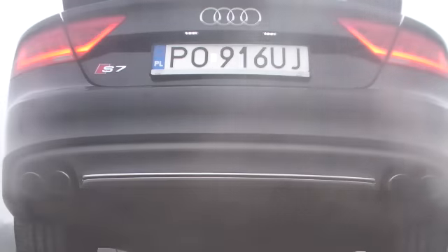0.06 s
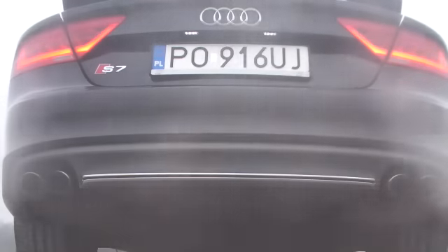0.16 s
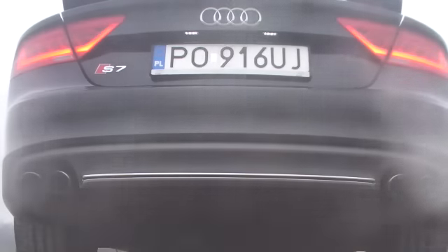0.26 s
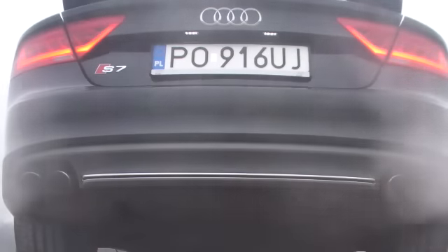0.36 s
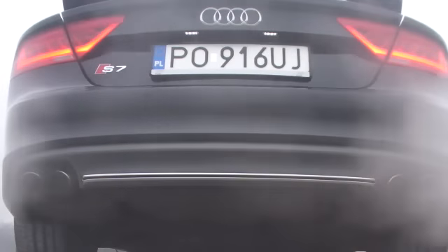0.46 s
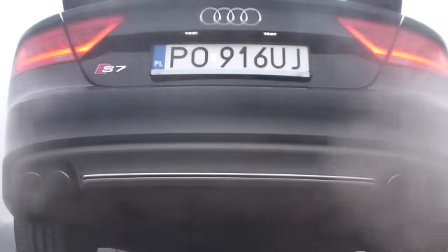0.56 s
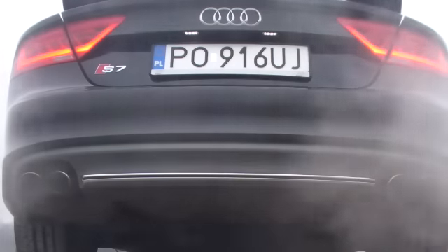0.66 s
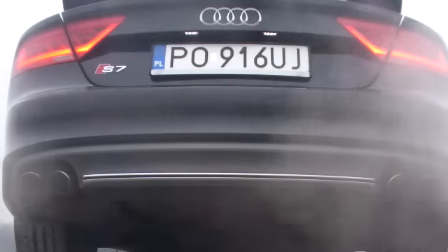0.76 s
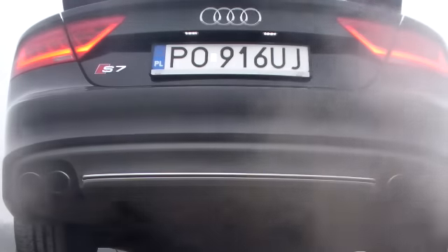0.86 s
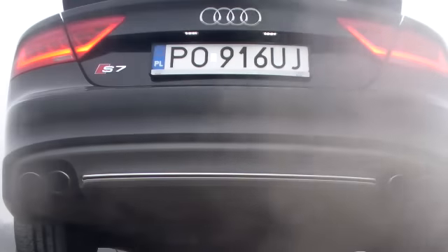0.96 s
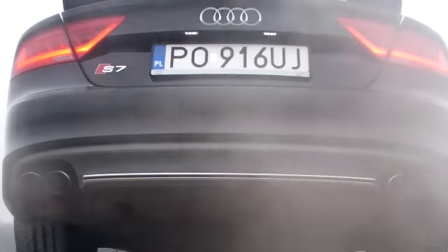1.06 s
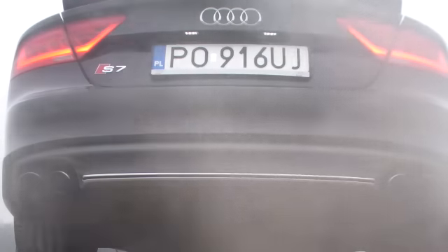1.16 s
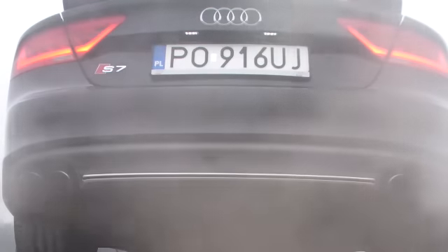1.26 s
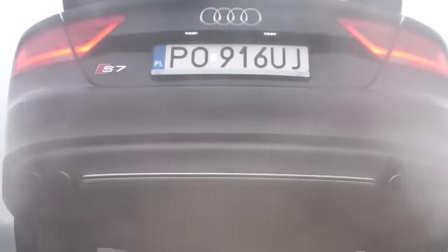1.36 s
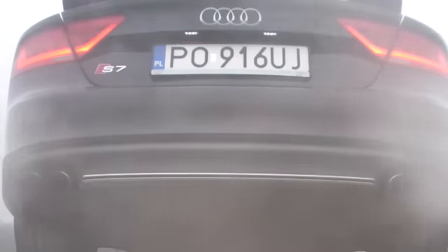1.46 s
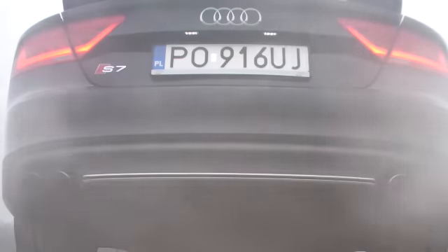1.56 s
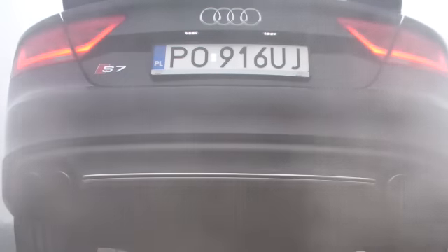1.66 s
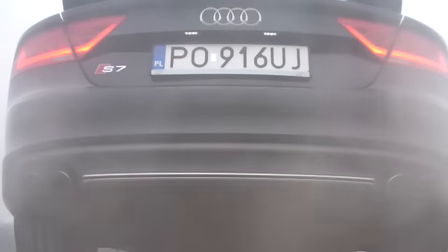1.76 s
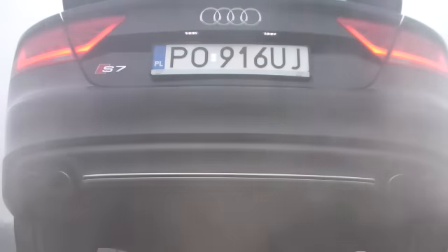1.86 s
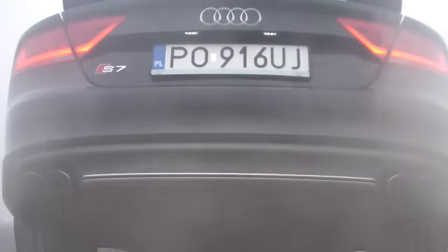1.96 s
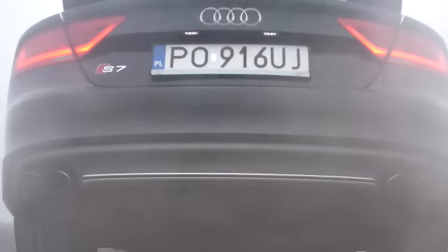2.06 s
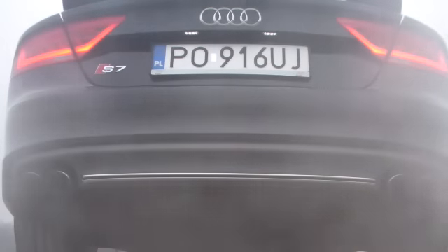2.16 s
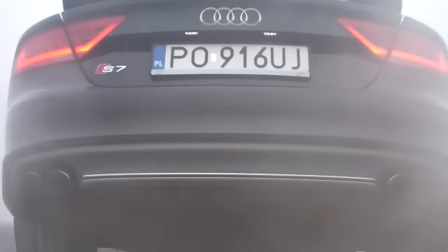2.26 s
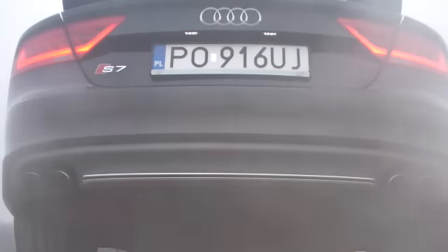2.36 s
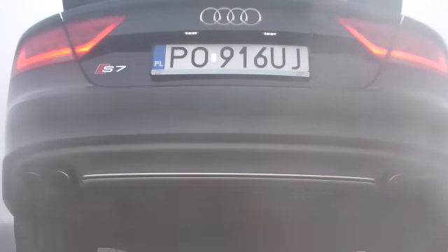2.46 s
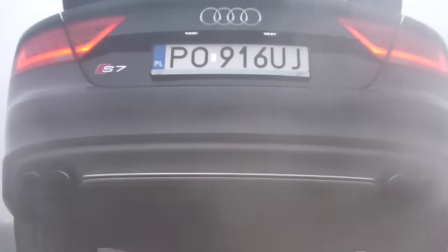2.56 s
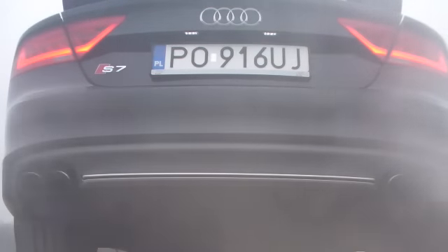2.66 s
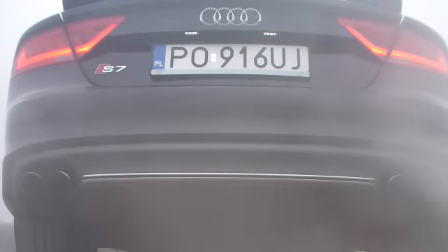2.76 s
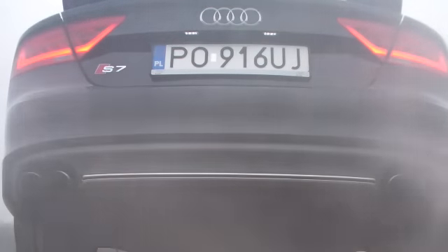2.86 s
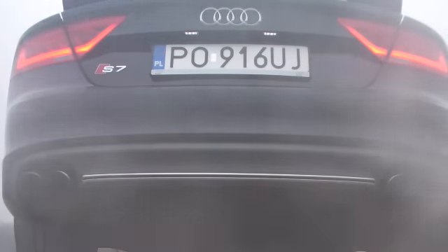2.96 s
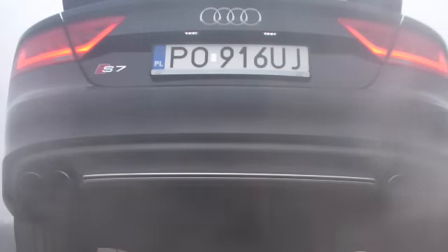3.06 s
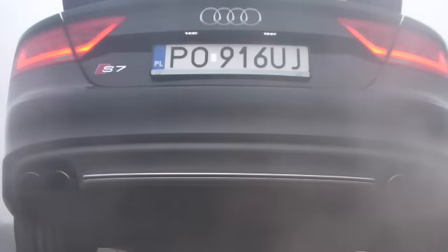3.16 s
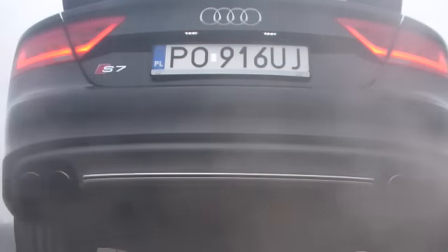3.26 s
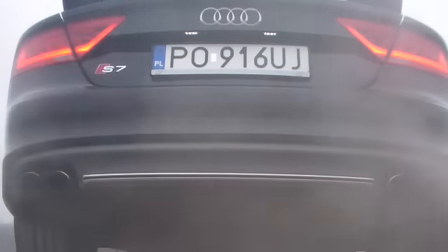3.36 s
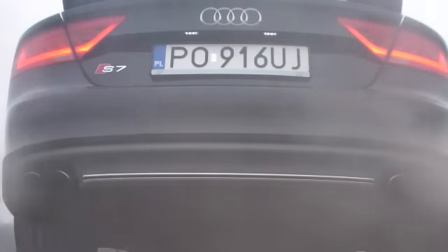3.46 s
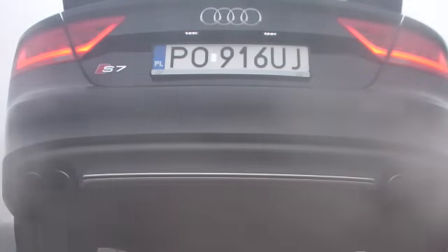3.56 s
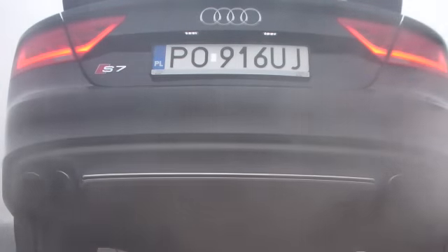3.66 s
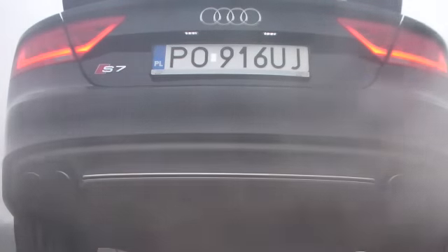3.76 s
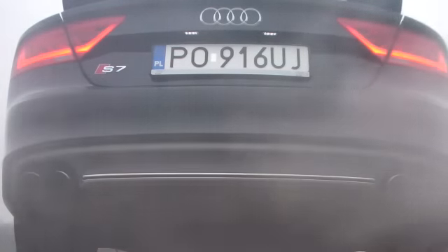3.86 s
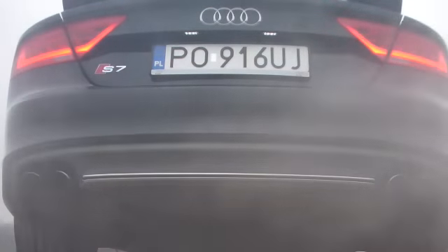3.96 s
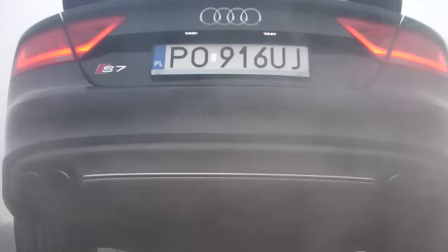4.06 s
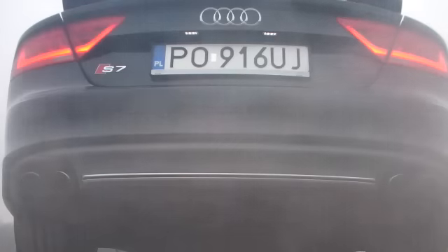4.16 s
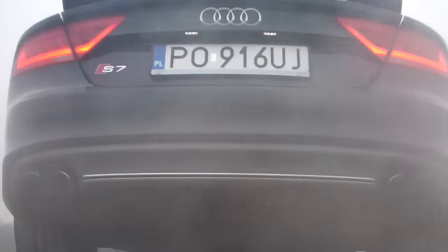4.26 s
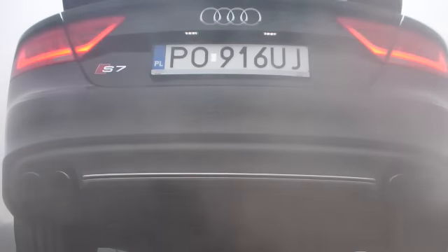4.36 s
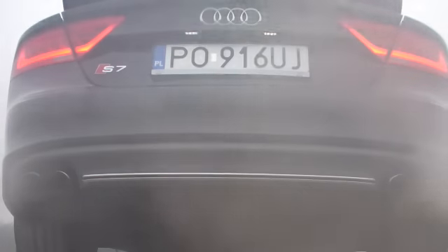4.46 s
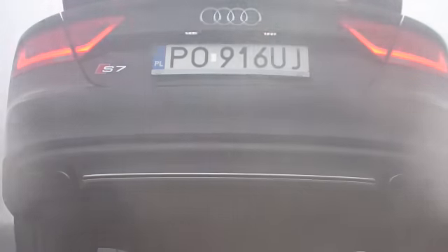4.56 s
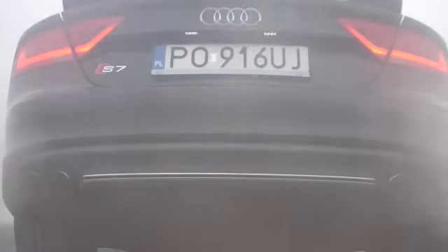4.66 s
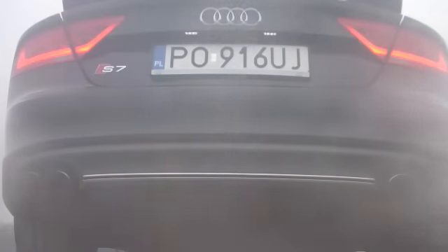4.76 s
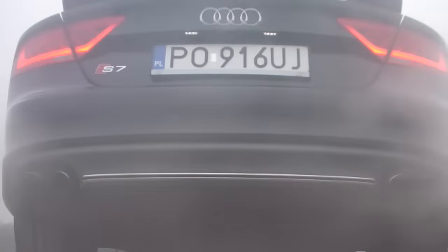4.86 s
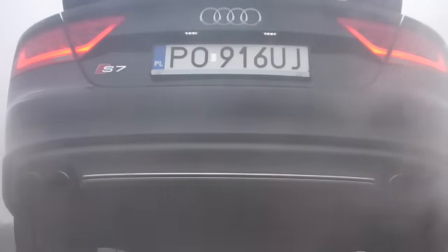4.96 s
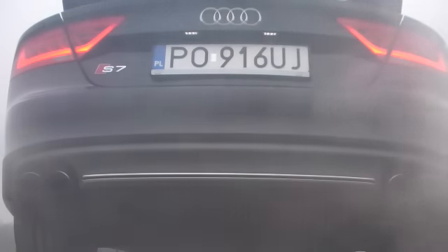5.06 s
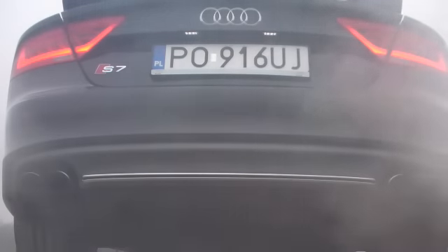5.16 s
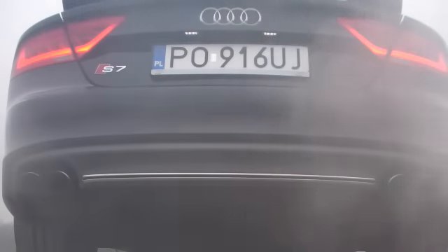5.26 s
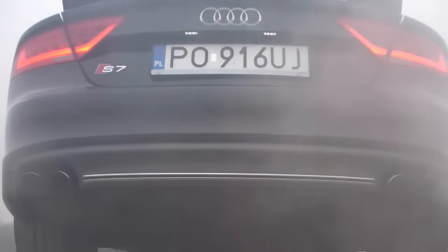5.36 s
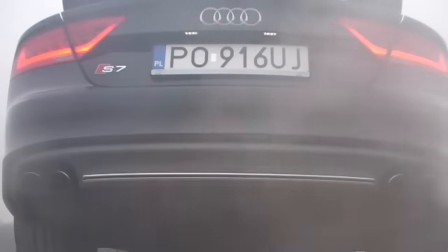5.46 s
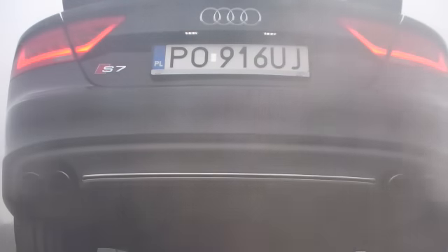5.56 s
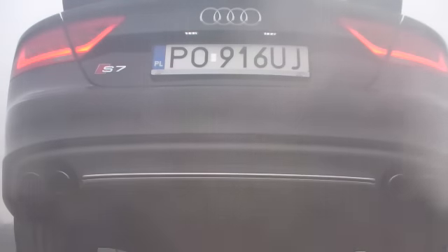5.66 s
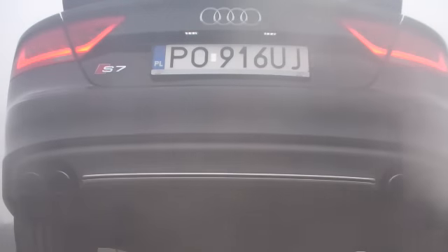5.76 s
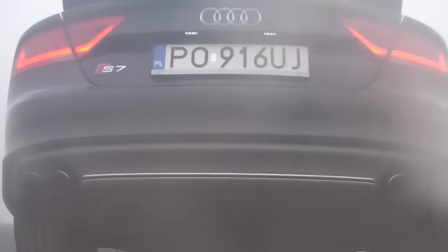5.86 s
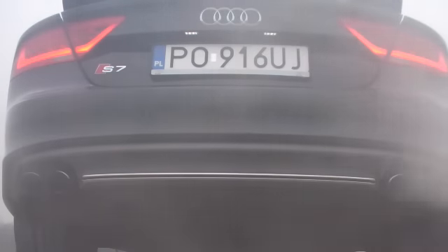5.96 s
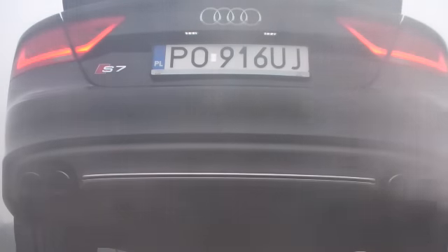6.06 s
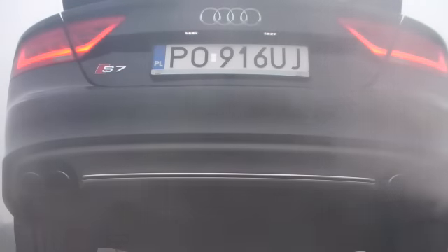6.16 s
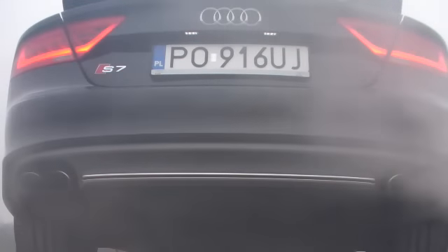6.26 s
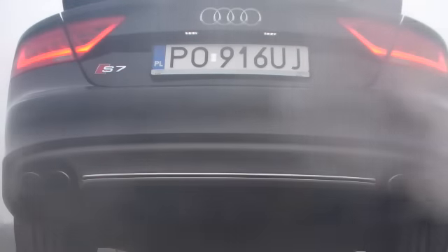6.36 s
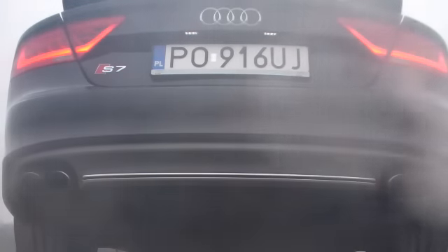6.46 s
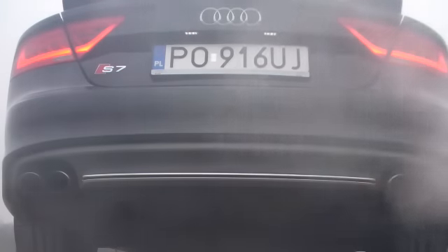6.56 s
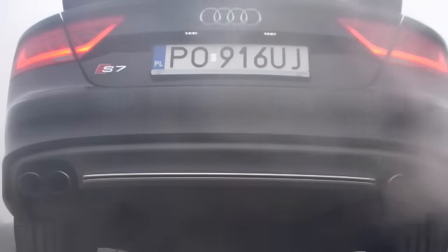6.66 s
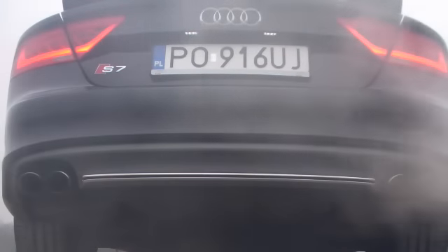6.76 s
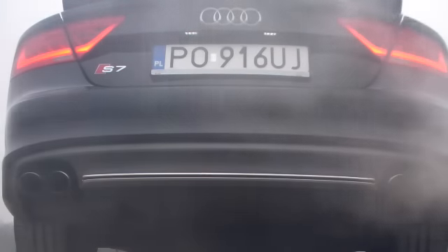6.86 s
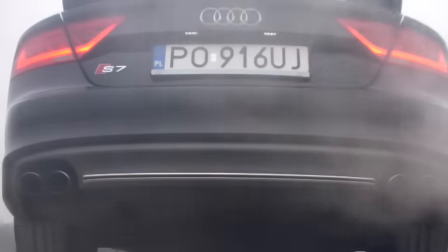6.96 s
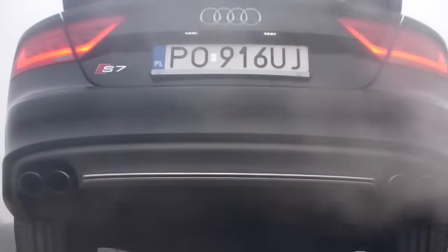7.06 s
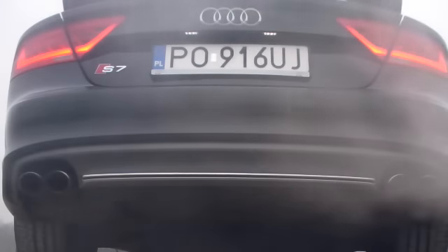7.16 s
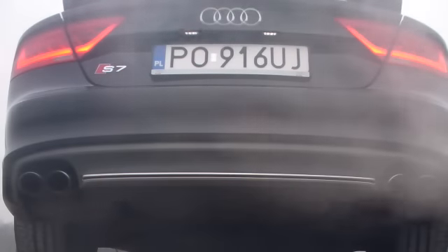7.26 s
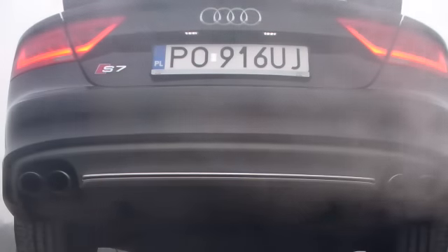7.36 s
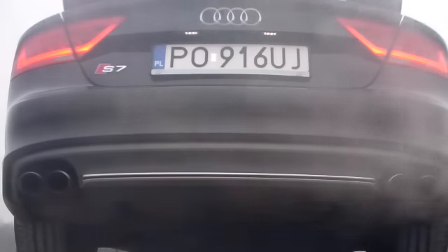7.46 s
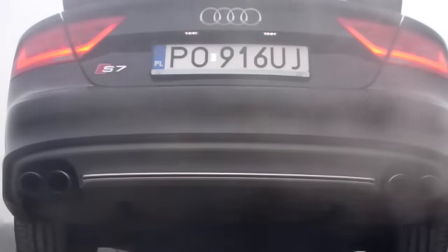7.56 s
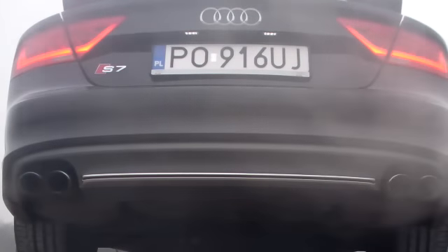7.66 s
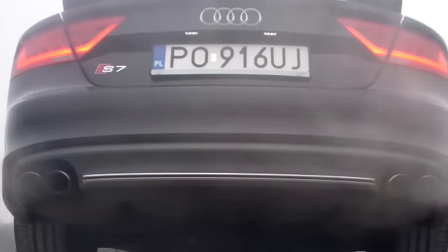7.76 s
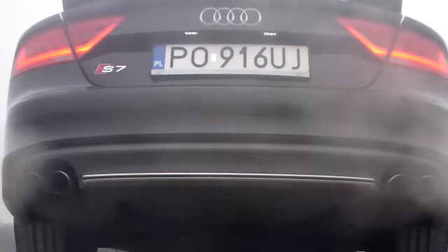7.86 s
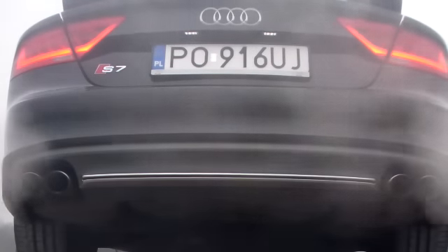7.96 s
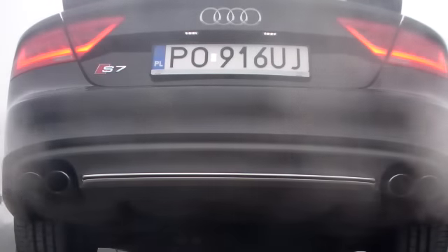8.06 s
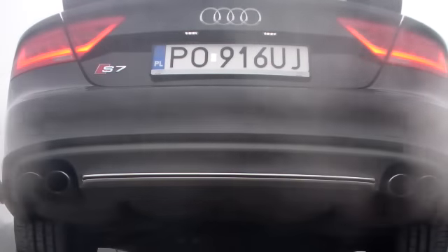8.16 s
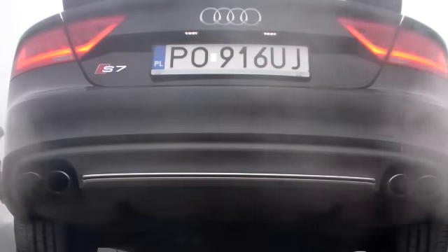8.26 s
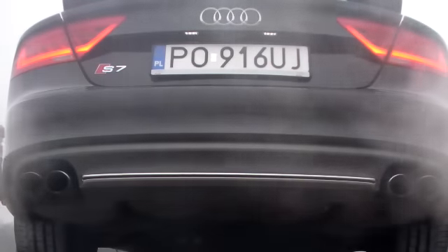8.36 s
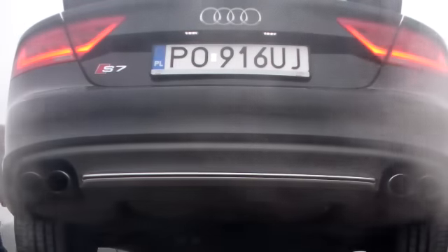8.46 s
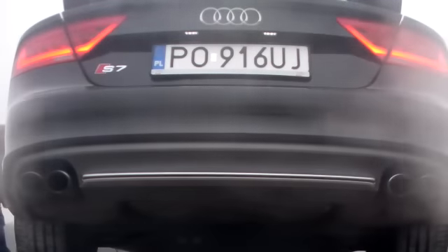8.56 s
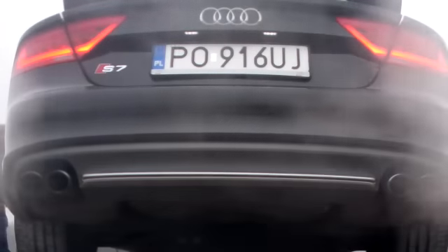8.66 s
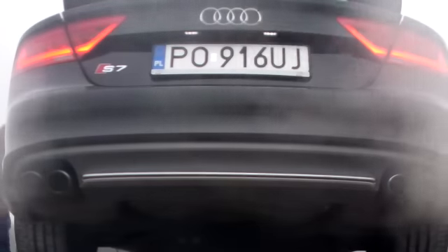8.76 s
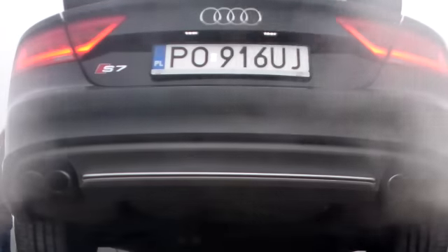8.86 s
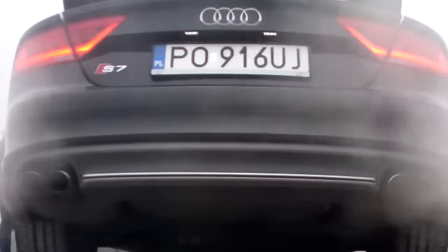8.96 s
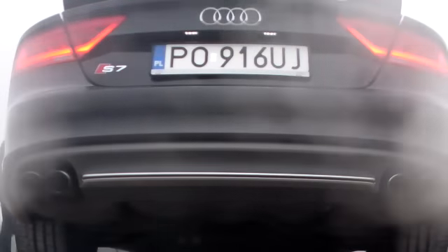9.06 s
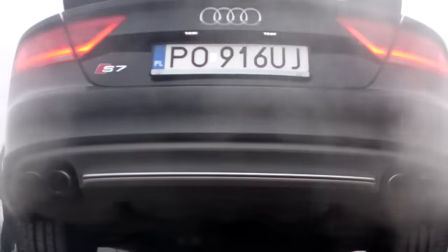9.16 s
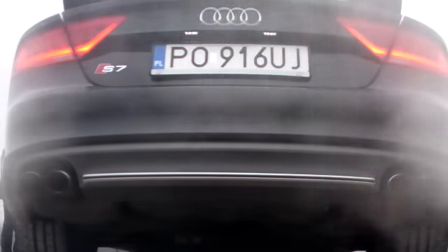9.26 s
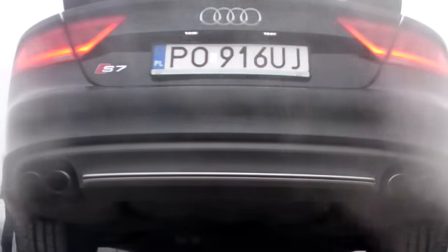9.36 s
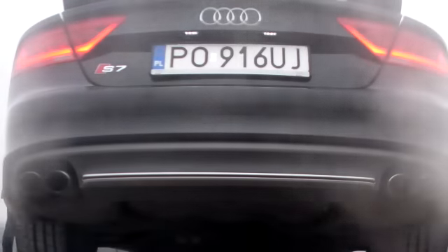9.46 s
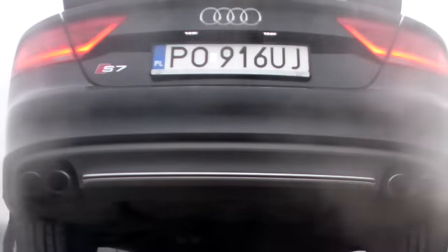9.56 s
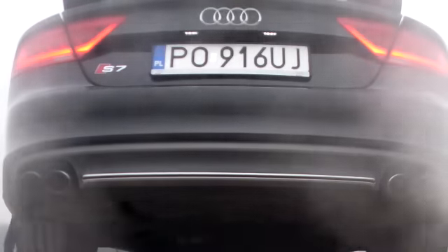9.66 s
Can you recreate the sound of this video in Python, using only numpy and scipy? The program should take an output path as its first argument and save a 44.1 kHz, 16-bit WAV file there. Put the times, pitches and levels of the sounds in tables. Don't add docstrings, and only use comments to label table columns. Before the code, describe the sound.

Close behind the exhausts of a parked eight-cylinder car, the engine snarls up in a long rev, then four quick blips with pops, thumps and gas hiss. It drops to a soft idle, revs twice more, idles again, gives a gentle half rev, and ends with a strong late-climbing roar falling away. Faint outdoor yard noise sits underneath.

```python
import sys
import numpy as np
from scipy import signal
from scipy.fft import rfft, irfft
from scipy.io import wavfile
from scipy.ndimage import uniform_filter1d

SR = 44100
rng = np.random.default_rng(int(sys.argv[2]) if len(sys.argv) > 2 else 0)


def file_out(sig):
    cols = np.atleast_2d(sig).T
    lim = np.clip(cols, -1, 1)
    pcm = np.round(lim * 32767).astype(np.int16)
    wavfile.write(sys.argv[1], SR, pcm)


def field_ratio(decibels):
    return 10 ** (np.asarray(decibels, dtype=float) / 20)


N = 428652
CONTROL_RATE = 1000

# press_s, top_s, release_s, top_cycle_hz, bend of the climb (+ early, - late)
REVS = [
    (.18, .24, .25, 14.4, 0),
    (.26, .68, .785, 32.6, .7),
    (1.205, 1.37, 1.41, 31.8, .6),
    (1.45, 1.56, 1.63, 32.5, .3),
    (1.7, 1.82, 1.88, 32.1, .3),
    (1.93, 2.0, 2.05, 31.6, .3),
    (3.31, 3.72, 3.765, 30.3, -.05),
    (4.38, 4.69, 4.84, 30.9, .1),
    (7.56, 7.89, 7.965, 15.5, .15),
    (8.49, 9.01, 9.12, 31.2, -.55),
]
START_HZ, IDLE_HZ = 17.8, 5.75
CATCH_HZ, SETTLE_S = 1.5, .4
FRICTION_HZ_PER_S, PUMPING_PER_S = 12, .3
LULL_DB, LULL_S = -1.5, 0.042

# full_s, shut_s, long_pipe_db, short_pipe_relative_db, jet_db
GULPS = [(0.287, 0.338, -26, -5, -43), (0.377, 0.375, -30, 9.5, -37), (0.433, 0.532, -18, -3, -33),
         (0.59, 0.59, -27, 6, -45), (0.681, 0.731, -11, -8.5, -34.5), (1.309, 1.367, -16.5, 2, -29.5),
         (1.563, 1.571, -9.5, -7.5, -29.5), (1.62, 1.676, -28, -12, -58), (1.791, 1.837, -19, -8, -42.5),
         (2.01, 2.005, -19.5, -3.5, -44), (2.097, 2.347, -32.5, 0.5, -62), (0.86, 0.967, -27, -1, -56),
         (5.554, 6.12, -53, 1, -58), (3.399, 3.651, -16, 3, -30), (3.677, 3.721, -19.5, 7.5, -32.5),
         (3.77, 3.79, -24, -19, -56), (4.44, 4.571, -13.5, -4, -35.5), (4.595, 4.648, -22.5, 8.5, -35.5),
         (4.699, 4.786, -20.5, -1, -43.5), (7.74, 7.832, -31, 0, -47), (7.847, 7.931, -33, 1.5, -42.5),
         (8.7, 8.957, -13, 0.5, -29.5), (8.987, 9.0, -24, 12.5, -27), (9.018, 9.081, -14, -2.5, -37)]
ATTACK_DB_PER_S, RELEASE_DB_PER_S = 203, 219
BREATHES_HZ, PIPE_DB_PER_HZ, JET_DB_PER_HZ = 27, 2.03, 1.3
GAS_LAG_S, DRONE_LAG_S = 0.096, 0.041
# cycle_hz, bank_imbalance_db (3rd order), alternate_firings_db (4th), all_firings_db (8th)
COAST_ORDERS = [(5.8, -71, -76, -47), (6.14, -73, -75, -49), (6.57, -58, -58, -35),
                (11, -57.5, -48.5, -31.5), (15.77, -35.5, -40.5, -35.5), (20, -34.5, -45.5, -34),
                (24.4, -27, -37, -49), (31.16, -30.5, -35.5, -44.5), (31.2, -30, -38.5, -53)]
# cycle_hz, pipe_ring_db, jet_db
COAST_GAS = [(5.94, -69, -72), (6.956, -53, -62), (8.438, -47, -52), (15.8, -40, -51.5),
             (20.4, -35.5, -45.5), (26, -33, -44), (31.16, -28.5, -43.5), (30.14, -34.5, -42.5)]
LOAD_SHARE = [0.13, 0.52, 0.43, -0.52]
PEDAL_DB = [-7, 1, 2]
RUSH_DB, SHORT_DB = -0.5, 2
# cycle_hz, coasting_db, pedal_down_db
ROUGHNESS = [(6, -9, -14), (8, -4, -12), (13, -8, -10), (19, -15, -9), (25, -19, -8), (30, -19, -6),
             (32, -19, 0)]

# freq_hz, gain_db
SILENCER = [(15, -24), (35, -18), (50, -2.5), (70, 1), (100, -1), (125, 5.5), (155, -0.5), (200, -12.5),
            (240, -5.5), (300, -53), (500, -38.5)]
# order, level_db
PATTERN = [(1, 0.5), (2, -10), (3, 1), (4, 1.5), (5, -0.5), (6, 2), (7, -11.5), (8, -1)]

CYLINDERS = [-2.5, -10, -9.5, -9.5]
# freq_hz, width_hz, level_db
LONG_PIPE = [(410.4, 47.4, -10.5), (432.2, 12.7, 3.5)]
SHORT_PIPE = [(492.2, 26.8, 0.5), (548.7, 38.2, -2)]
# freq_hz, width_hz, level_db
RUSH = [(222.4, 20.6, -10.5), (367, 81, -8.5), (601.6, 47.4, 0.5), (669.6, 118, -6), (783, 219, -11)]
# start_s, peak_db
POPS = [(0.58, -4), (0.653, -16), (0.868, -8), (1.289, -3.5), (1.495, -8.5), (2.019, -12), (3.606, -10),
        (3.643, -2), (4.582, -4), (8.9, -5), (9.168, -16)]
# start_s, peak_db, length_s
SPITS = [(.175, -41.5, 0.013), (0.577, -15, 0.0098), (0.659, -27, 0.01), (1.423, -23, 0.012),
         (2.026, -41.5, 0.02), (2.57, -54, 0.032), (3.125, -52, .025), (4.246, -35, 0.0058),
         (5.095, -59, 0.033), (5.319, -42, 0.037), (.86, -45, 0.022), (4.43, -37.5, 0.046)]
# freq_hz, density_db (per Hz)
HISS = [(560, -5.5), (960, -5.5), (1180, -11.5), (1710, -12.5), (1980, -8), (2200, -9.5), (3210, -4),
        (3570, -1.5), (4310, -9), (5610, -10.5), (5980, -11.5), (7070, -14.5), (7770, -10.5), (10100, -6.5),
        (11800, -16.5), (15400, -49), (22000, -120)]

# freq_hz, density_db (per Hz)
YARD = [(18, -30), (30, -42), (128, 2.5), (222, -15), (436, -4.5), (1380, -27.5), (3300, -30),
        (6820, -35.5), (10200, -31), (11800, -37.5), (15400, -76), (22000, -120)]
YARD_DB = -42
# freq_hz, coherence (0-1)
PORTS = [(60, .97), (300, .995), (3400, .996), (3900, .98), (4300, .9), (5000, .65), (7200, .8),
         (9000, .68), (12000, .4)]

# turns_per_cycle, level_db
WHINE = [(26.7, -39.5), (53.2, -49.5)]
# freq_hz, gain_db
PANEL = [(680, -27), (730, -10), (850, 2), (960, 0.5), (1000, -30)]
# start_s, peak_db, pitch_hz
THUMPS = [(0.829, -11.5, 62.6), (1.438, -8, 72.7), (1.549, -15, 59.2), (1.629, -7.5, 65),
          (1.848, -11.5, 64.6), (1.997, -8, 68), (3.759, -8, 48.4), (4.786, -6, 64.6), (6.949, -25, 53.7),
          (7.379, -40, 53.7), (9.099, -10, 75.59)]

# freq_hz, difference_db
LEAN = [(30, -2.4), (125, -.7), (300, 0), (4000, -.2), (8000, -1.5), (12000, -.6)]
# freq_hz, width_hz, gain_db
COLOUR = [(1112, 3.6, 8), (3500, 60, 2.5), (3340, 210, 0.5), (6000, 48, -21), (6610, 110, -4),
          (7190, 60, -4), (11150, 77, -9), (11470, 150, 2.5)]


def on_log(table, hz):
    f, v = np.transpose(table)
    return np.interp(np.log(np.maximum(hz, 1)), np.log(f), v)


def by_speed(table, hz):
    at, *columns = np.transpose(table)
    return [np.interp(hz, at, c) for c in columns]


def unit(x):
    return x / np.sqrt(np.mean(x ** 2))


def envelope(x, span_s):
    return np.sqrt(uniform_filter1d(x ** 2, int(span_s * SR)) + 1e-12)


def steady(x, span_s):
    return x / envelope(x, span_s)


def shape(x, gain):
    return irfft(rfft(x) * gain(np.arange(N // 2 + 1) * SR / N), N)


def ring(x, modes):
    out = 0
    for k, (hz, width, db) in enumerate(modes):
        b, a = signal.iirpeak(hz, hz / width, fs=SR)
        out = out + (-1) ** k * field_ratio(db) * signal.lfilter(b, a, x)
    return out


def walk(rate_hz):
    k = int(SR / rate_hz)
    held = np.repeat(rng.standard_normal(N // k + 1), k)
    return unit(uniform_filter1d(uniform_filter1d(held, k), k)[:N])


def swell(start_s, length_s):
    first = int(start_s * SR)
    late = np.arange(min(int(12 * length_s * SR), N - first)) / (length_s * SR)
    return slice(first, first + len(late)), late * np.exp(1 - late)


def coast(late_s, hz):
    floor = FRICTION_HZ_PER_S / PUMPING_PER_S
    caught = np.log((hz + floor) / (IDLE_HZ + CATCH_HZ + floor)) / PUMPING_PER_S
    fall = (hz + floor) * np.exp(-PUMPING_PER_S * np.maximum(late_s, 0)) - floor
    settle = IDLE_HZ + CATCH_HZ * np.exp((caught - np.maximum(late_s, caught)) / SETTLE_S)
    return np.where(late_s < caught, fall, settle)


def speed(t):
    hz, pedal, lull = coast(t, START_HZ), 0, 0
    for press, top, release, top_hz, bend in REVS:
        u = np.clip((t - press) / (top - press), 0, 1)
        low_hz = np.interp(press, t, hz)
        climb = low_hz + (top_hz - low_hz) * (u + bend * u * (1 - u))
        after = np.where(t < top, climb, coast(t - release, top_hz))
        hz = np.where(t < press, hz, after)
        pedal = pedal + ((t > press) & (t < release + .02))
        lull = lull + LULL_DB * np.exp(-((t - press) / LULL_S) ** 2)
    hz = uniform_filter1d(hz, int(.05 * CONTROL_RATE))
    pedal = uniform_filter1d(np.minimum(pedal, 1.), int(.08 * CONTROL_RATE))
    return hz, pedal, lull


def lagged(t, hz, lag_s):
    return np.minimum(hz, np.interp(t - lag_s, t, hz))


def fuel(t, hz, lull):
    ring_db, jet_db = by_speed(COAST_GAS, lagged(t, hz, GAS_LAG_S))
    long, short, jet = field_ratio(ring_db + lull), field_ratio(ring_db + lull + SHORT_DB), field_ratio(jet_db + lull)
    for full, shut, db, short_db, hiss_db in GULPS:
        edge = -ATTACK_DB_PER_S * np.maximum(full - t, 0) - RELEASE_DB_PER_S * np.maximum(t - shut, 0)
        breathing_hz = min(np.interp(shut, t, hz), BREATHES_HZ)
        slow_hz = np.maximum(breathing_hz - hz, 0) * (t < shut)
        gulp = field_ratio(db + edge - PIPE_DB_PER_HZ * slow_hz)
        long = np.hypot(long, gulp)
        short = np.hypot(short, gulp * field_ratio(short_db))
        jet = np.hypot(jet, field_ratio(hiss_db + edge - JET_DB_PER_HZ * slow_hz))
    decibels = lambda v: 20 * np.log10(v)
    load = np.maximum(decibels(np.maximum(long, short)) - ring_db - SHORT_DB, 0)
    return decibels(long), decibels(short / long), decibels(jet), load


def firings(turns):
    count = np.floor(8 * turns).astype(int)
    chance = rng.standard_normal((count[-1] + 1, 3))[count].T
    return 8 * turns - count, count, chance


def drone(hz, turns, bank_db, pair_db, all_db):
    out = 0
    for k in (*range(1, 12), 13, 16):
        if k % 2:
            base, db = 3, bank_db
        elif k % 8 == 0:
            base, db = 8, all_db
        else:
            base, db = 4, pair_db
        db = db + PATTERN[(k - 1) % 8][1] + on_log(SILENCER, k * hz) - on_log(SILENCER, base * hz)
        db = db - 13.0 * (k > 8.5)
        phase = 2 * np.pi * (k * turns + rng.random())
        out = out + field_ratio(db + 1.0 * walk(15)) * np.sqrt(2) * np.cos(phase)
    return out


def burble(place, size):
    pulses = size * np.exp(-place / 0.46)
    return steady(shape(pulses, lambda f: field_ratio(on_log(SILENCER, f))), 0.17)


def pipe(modes, knock, flow):
    steep = signal.butter(3, [300, 900], "band", fs=SR, output="sos")
    drive = unit(knock) + field_ratio(-4.0) * flow
    return steady(signal.sosfilt(steep, ring(drive, modes)), 0.064)


def tailpipes(place, count, chance, puff, ring_db, short_db, rush_db, rough_db):
    flow = puff * rng.standard_normal(N)
    pressure = field_ratio(np.array(CYLINDERS)[count % 4] + 4.6 * chance[1]) * (1 - place)
    knock = np.diff(pressure, prepend=0)
    knock = steady(knock, .1) * field_ratio(.35 * rough_db)
    pipes = pipe(LONG_PIPE, knock, flow) + field_ratio(short_db) * pipe(SHORT_PIPE, knock, flow)
    soft = signal.butter(2, 1000, fs=SR, output="sos")
    rush = field_ratio(rush_db) * steady(signal.sosfilt(soft, ring(flow, RUSH)), 0.183)
    pops = np.zeros(N)
    for s, db in POPS:
        pops[int(s * SR)] = field_ratio(db + 34)
    apart = field_ratio(-30) * steady(pipes + rush, .05)[::-1] * np.array([[1], [-1]])
    return field_ratio(ring_db) * (pipes + rush + apart) + signal.sosfilt(soft, ring(pops, RUSH + SHORT_PIPE))


def jet(puff, jet_db):
    crackle = field_ratio(1.0 * walk(40) + 2.15 * np.maximum(walk(250), 0))
    level = field_ratio(jet_db) * unit(crackle * puff ** 0.17)
    for s, db, length in SPITS:
        span, fade = swell(s, max(length, .002))
        level[span] += field_ratio(db - 6.5) * fade
    return level


def ports(table):
    mid, side = rng.standard_normal((2, N))
    like = lambda f: np.clip(on_log(PORTS, f), 0, 1)
    mid = shape(mid, lambda f: field_ratio(on_log(table, f)) * np.sqrt(1 + like(f)))
    side = shape(side, lambda f: field_ratio(on_log(table, f)) * np.sqrt(1 - like(f)))
    return unit(np.array([mid + side, mid - side]))


def yard():
    return field_ratio(YARD_DB - 4.0 + 0.62 * walk(2.89)) * ports(YARD)


def whine(hz, turns):
    out = 0
    for k, db in WHINE:
        level = field_ratio(db + on_log(PANEL, k * hz))
        out = out + level * np.sqrt(2) * np.sin(2 * np.pi * k * turns)
    return out * field_ratio(1.5 * walk(12))


def thumps():
    out = np.zeros(N)
    for s, db, hz in THUMPS:
        span, fade = swell(s, 0.0086)
        out[span] += field_ratio(db - 8.0) * fade * np.sin(2 * np.pi * hz * np.arange(len(fade)) / SR)
    return out


def scene():
    t = np.arange(0, N / SR + .01, 1 / CONTROL_RATE)
    fine = lambda *controls: [np.interp(np.arange(N) / SR, t, c) for c in controls]
    hz, pedal, lull = speed(t)
    ring_db, short_db, jet_db, load = fuel(t, hz, lull)
    coast_db = by_speed(COAST_ORDERS, lagged(t, hz, DRONE_LAG_S))
    orders_db = [db + lull + share * load + more * pedal
                 for db, share, more in zip(coast_db, LOAD_SHARE, PEDAL_DB)]
    smooth_db, ragged_db = by_speed(ROUGHNESS, hz)
    rush_db = RUSH_DB + LOAD_SHARE[-1] * load + np.maximum(short_db, 0)
    hz, rough_db = fine(hz, smooth_db + pedal * (ragged_db - smooth_db))
    turns = np.cumsum(hz) / SR
    place, count, chance = firings(turns)
    puff = field_ratio(1.4 * chance[1]) * (1.27 + np.exp(-place / 0.23))
    clean = drone(hz, turns, *fine(*orders_db))
    loudness = envelope(clean, .12)
    rough = loudness * field_ratio(rough_db) * burble(place, chance[0])
    apart = field_ratio(-17) * loudness * burble(place, chance[2]) * np.array([[1], [-1]])
    pipes = tailpipes(place, count, chance, puff, *fine(ring_db, short_db, rush_db), rough_db)
    hiss = jet(puff, fine(jet_db)[0]) * ports(HISS)
    return clean + rough + apart + pipes + hiss + yard() + whine(hz, turns) + thumps()


def top_cut(x):
    return signal.sosfilt(signal.butter(12, 11980, fs=SR, output="sos"), x)


def record(dry):
    colour = lambda f: sum(db * np.exp(-((f - hz) / width) ** 2) for hz, width, db in COLOUR)
    left, right = [shape(v, lambda f: field_ratio(side * on_log(LEAN, f) / 2 + colour(f)))
                   for v, side in zip(dry, (1, -1))]
    rounded = np.tanh(.62 * np.array([left, right])) / .62
    return top_cut(rounded)


dry = scene()
out = record(dry)
file_out(out)
```